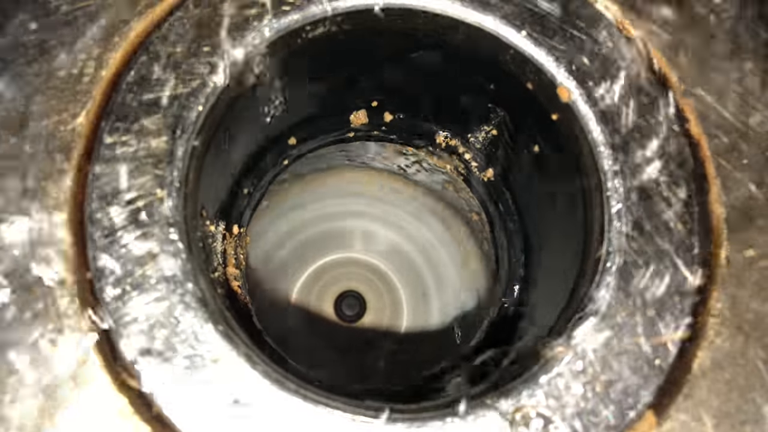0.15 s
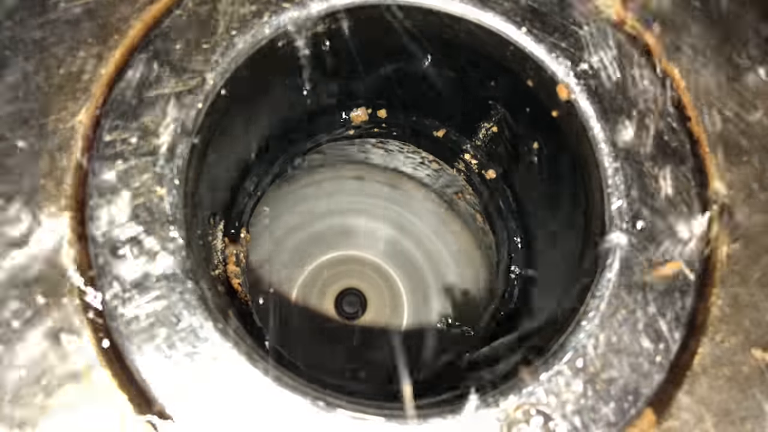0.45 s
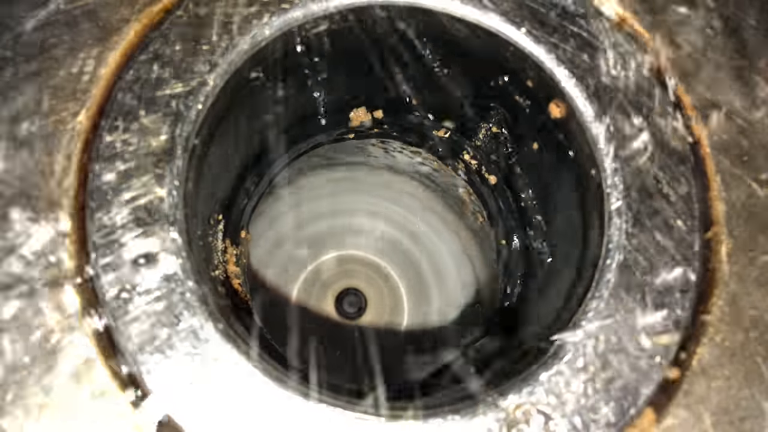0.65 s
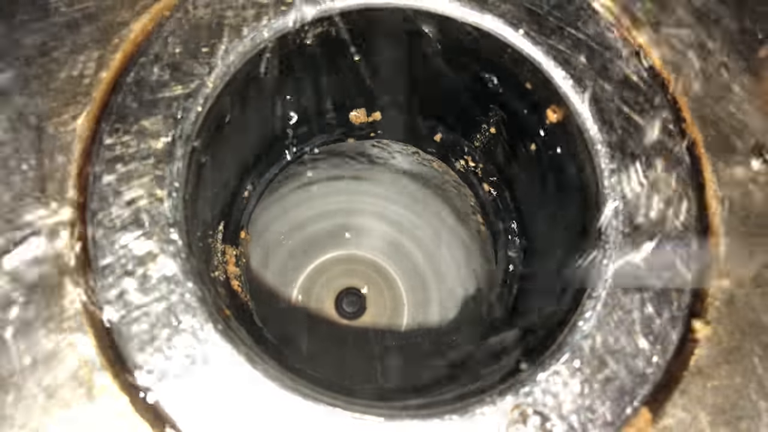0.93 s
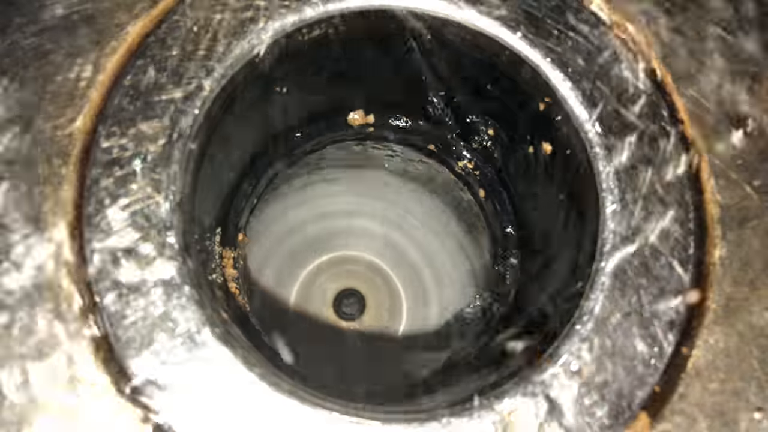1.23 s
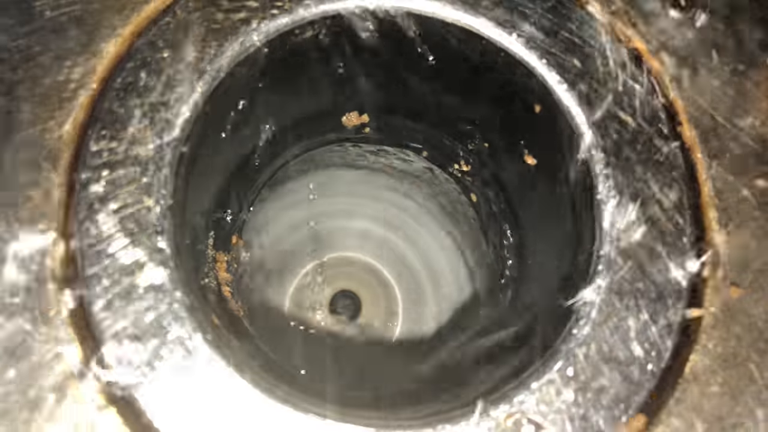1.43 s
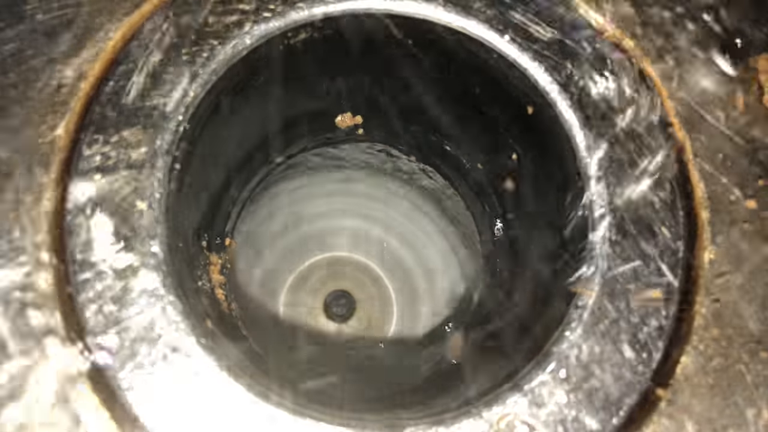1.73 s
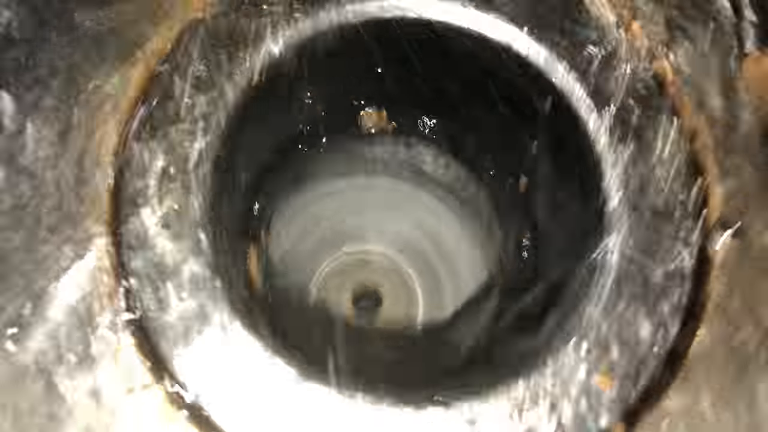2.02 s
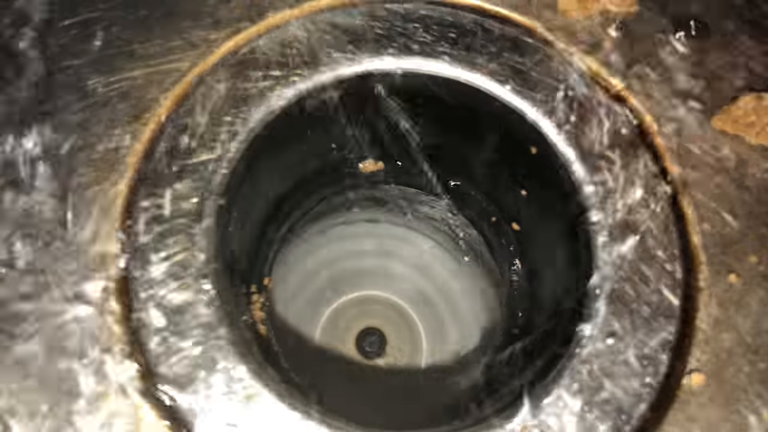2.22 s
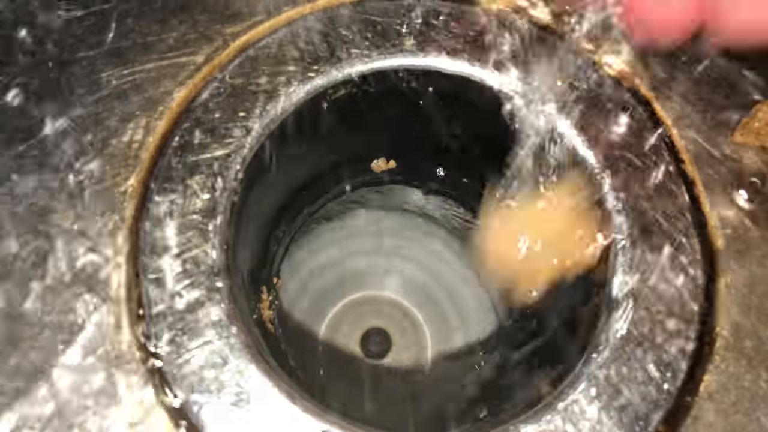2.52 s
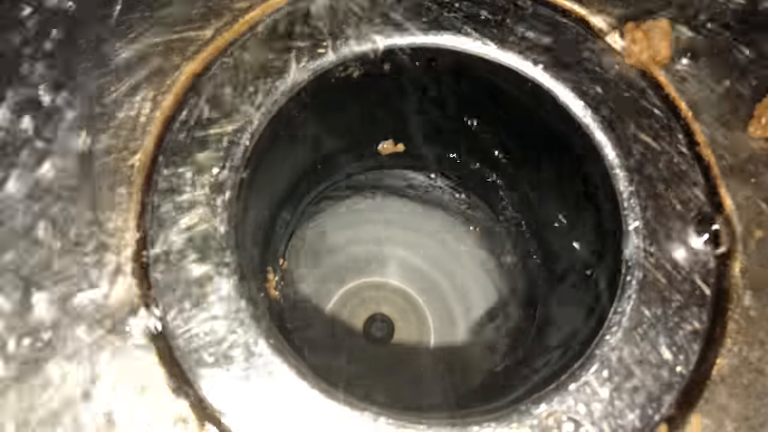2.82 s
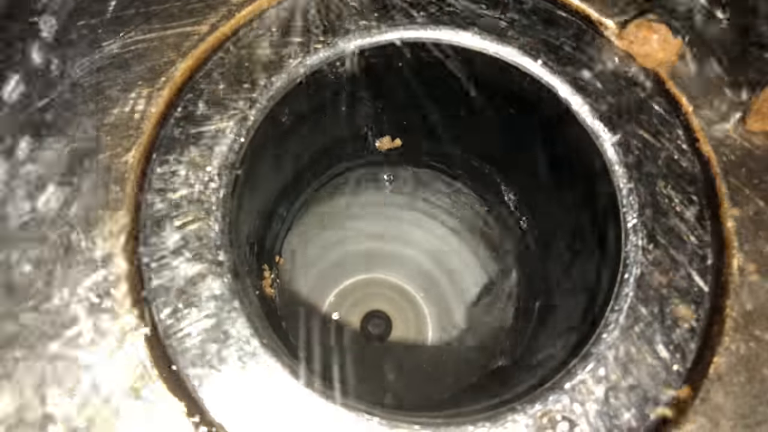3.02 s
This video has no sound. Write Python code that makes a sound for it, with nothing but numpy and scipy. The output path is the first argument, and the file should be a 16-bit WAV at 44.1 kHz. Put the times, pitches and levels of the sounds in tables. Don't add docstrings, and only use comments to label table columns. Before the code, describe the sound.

Close over a kitchen drain, a waste grinder whirs and hums without pause, churning water and clattering small scraps against metal. Soft knocks come midway, then a lump drops in and grinds harder.

```python
import sys
import numpy as np
from scipy import signal
from scipy.fft import rfft, irfft, next_fast_len
from scipy.io import wavfile
from scipy.ndimage import uniform_filter1d, minimum_filter1d, map_coordinates

SR = 44100
rng = np.random.default_rng(int(sys.argv[2]) if len(sys.argv) > 2 else 0)


def to_wav(sig):
    pcm = np.clip(np.atleast_2d(sig), -1, 1) * 32767
    pcm = np.round(pcm).astype(np.int16)
    wavfile.write(sys.argv[1], SR, pcm.T)


def invert_db(x):
    u = np.asarray(x, float) / 20
    return 10 ** u


N = 139356
TIME_S = np.arange(N) / SR
LUGS = 2


def unit(x):
    return x / np.sqrt(np.mean(x ** 2) + 1e-20)


def along(points, hz):
    f, v = np.transpose(points)
    return np.interp(np.log(hz + 1), np.log(f + 1), v)


def curves(rows):
    s, *cols = np.transpose(rows)
    return [np.interp(TIME_S, s, c) for c in cols]


def wobble(rate_hz):
    return map_coordinates(rng.standard_normal(2000), [np.arange(N) * min(rate_hz, 600) / SR])


def filtered(x, response):
    m = next_fast_len(N + SR // 2)
    return irfft(rfft(x, m) * response(np.fft.rfftfreq(m, 1 / SR)), m)[:N]


def pole(f, hz, width_hz):
    return 1j * f * width_hz / (hz * hz - f * f + 1j * f * width_hz)


def resonant(x, peaks, shape, dead=()):
    def response(f):
        h = 0
        for k, (hz, width_hz, db) in enumerate(peaks):
            h = h + (-1) ** k * invert_db(db) * pole(f + 1, hz, width_hz)
        h = h * invert_db(along(shape, f))
        for hz, width_hz, db in dead:
            h = h * (1 - (1 - invert_db(db)) * pole(f + 1, hz, width_hz))
        return h
    return unit(filtered(x, response))


def turns():
    # start_s, speed_hz
    speed = [(0.0, 81.0), (0.62, 80.2), (0.87, 80.3), (1.26, 79.7), (1.65, 79.9), (1.97, 79.3),
             (2.16, 78.4), (2.54, 79.6), (2.78, 79.4), (2.96, 78.8), (3.02, 77.1), (3.16, 78.2)]
    return 2 * np.pi * np.cumsum(curves(speed)[0]) / SR


def debris(per_s, spread_db, lug_share, surge_db):
    chance = per_s / SR * (1 + lug_share * np.sin(LUGS * turns())) * invert_db(surge_db)
    u = rng.random((3, N))
    hit, sign = u[0] < chance, np.sign(u[1] - .5)
    size = invert_db(-spread_db * np.log(u[2] + 0.0033))
    return unit(hit * sign * size)


def spatter(surge_db, mid_hz, octaves, cycles, spread_db, count):
    u, t = rng.random((count, 3)), np.arange(200) / SR
    share = np.cumsum(invert_db(surge_db) * (1 + .5 * np.sin(LUGS * turns())))
    at = np.searchsorted(share / share[-1], u[:, 0])
    hz = np.clip(mid_hz * 2 ** (octaves * rng.standard_normal(count)), 1500, 16000)[:, None]
    size = invert_db(-spread_db * np.log(u[:, 1:2] + .01))
    tone = size * np.sin(2 * np.pi * hz * t) * np.exp(-hz * t / cycles)
    where = at[:, None] + np.arange(len(t))
    return unit(np.bincount(where.ravel(), tone.ravel(), N + len(t))[:N])


def burst(rows, t60_s, cluster_s, count):
    out, t = np.zeros(N + SR), np.arange(SR // 10) / SR
    envelope = invert_db(-60 * t / t60_s) * (1 - np.exp(-t / .0006))
    for start_s, level_db in rows:
        for k in range(count):
            late, uneven = rng.standard_normal(2)
            size = invert_db(level_db - 2.5 * k + 1.5 * uneven * (k > 0))
            at = round((start_s + k * cluster_s * (1 + .2 * late)) * SR)
            out[at:][:len(t)] += size * envelope * rng.standard_normal(len(t))
    return out[:N]


def motor():
    # order, level_db, unsteadiness_db
    harmonics = [(1, -31.5, .6), (3, -35, 1.5), (4, -26.5, 1.5), (5, -39, 2), (6, -36.5, 1.4),
                 (11, -49, 2.5)]
    # start_s, level_db
    whine_level = [(0, -22), (.6, -23.5), (1, -23), (1.5, -21), (2, -23), (2.5, -21.5), (2.9, -24),
                   (3.16, -24)]
    slots, hum_hz, hum_db = 30, 120, -25
    whine_db = curves(whine_level)[0] + 1.76 * wobble(20)
    total = invert_db(whine_db) * np.sin(slots * turns() + 0.1 * wobble(32))
    for order, db, unsteady_db in harmonics:
        phase = round(order) * turns() + 0.094 * unsteady_db * wobble(19) + order * order
        total = total + invert_db(db + unsteady_db * wobble(12)) * np.sin(phase)
    hum = invert_db(hum_db + .4 * wobble(8)) * np.sin(2 * np.pi * hum_hz * TIME_S)
    return np.sqrt(2) * (total + hum)


def lumps():
    # start_s, peak_db, pitch_hz
    pushes = [(.445, -24, 44), (1.168, -19, 65), (1.558, -10, 129), (1.585, -14, 50), (2.045, -14, 222),
              (2.055, -16, 50), (2.861, -3.5, 172), (2.965, -13.5, 604), (2.978, -10, 472),
              (3.013, -9, 150), (3.03, -10, 320)]
    # start_s, peak_db
    knocks = [(1.165, -17), (1.56, -21), (2.042, -7), (2.855, -9), (2.864, -12), (2.96, -12), (2.975, -10),
              (2.99, -12), (3.003, -11), (3.017, -11)]
    contact_s = .0011
    out, t = np.zeros(N + SR), np.arange(SR // 4) / SR
    envelope = invert_db(-60 * t / 0.085) * (1 - np.exp(-t / .004))
    for start_s, db, hz in pushes:
        out[round(start_s * SR):][:len(t)] += invert_db(db) * envelope * np.sin(2 * np.pi * hz * t)
    pulse = np.sin(np.pi * np.minimum(t / contact_s, 1)) ** 2
    for start_s, db in knocks:
        out[round(start_s * SR):][:len(t)] += invert_db(db) * pulse
    return out[:N]


def rattles():
    # start_s, peak_db, brightness_db
    strikes = [(0.0453, -12.5, -19), (0.2204, -17.5, -23), (0.2756, -16.5, -17), (0.313, -10.5, -13),
               (0.4445, -18, -31), (0.606, -11.5, -11), (0.8084, -9.5, -26), (0.953, -15, -13),
               (1.0905, -11, -19), (1.4243, -16, -13), (1.4671, -10.5, -32), (1.511, -16.5, -21),
               (1.6435, -19, -6), (1.7045, -22, -17), (1.8312, -13, -12.5), (2.051, -23, -18),
               (2.158, -13.5, -23), (2.1844, -15, -20), (2.2613, -15.5, -16), (2.389, -12, -20),
               (2.4496, -12.5, -17), (2.6523, -11, -17), (2.7215, -14.5, -14), (2.7781, -10, -19),
               (2.822, -17, -18), (2.8494, -14, -14), (2.9113, -15, -11), (2.9647, -7, -21),
               (2.9906, -10.5, -26), (3.0586, -19, -22)]
    ring = [(3230, 1120, 13), (4540, 930, 1.5)]  # pitch_hz, width_hz, level_db
    dull = burst([(s, db) for s, db, _ in strikes], 0.012, .005, count=3)
    dull = filtered(dull, lambda f: sum(invert_db(db) * pole(f + 1, hz, w) ** 2 for hz, w, db in ring))
    tick = burst([(s, db + bright_db) for s, db, bright_db in strikes], 0.025, 0.0031, count=4)
    tick = filtered(tick, lambda f: pole(f + 1, 6900, 6100) ** 2)
    return invert_db(6) * (dull + tick)


def bowl(loaded):
    # pitch_hz, width_hz, level_db
    modes = [(169, 26.6, -9), (240, 78, -14), (311.5, 17.4, 0.5), (384, 47.4, -12), (449, 46, -11.5),
             (613.4, 13, -15), (624, 21, -20)]
    # pitch_hz, level_db
    rumble_shape = [(20, -3), (60, 9), (130, -4), (680, -8.5), (800, -10.5), (2000, 5)]
    bowl_db, load_db = -24, 4
    gain = invert_db(bowl_db + load_db * loaded + 0.41 * wobble(8.42))
    return gain * resonant(rng.standard_normal(N), modes, rumble_shape)


def spray(surge_db):
    # pitch_hz, level_db_per_hz
    spectrum = [(2000, -13), (2900, -2.5), (4400, -18), (4900, 0), (5800, -10), (8500, -9.5),
                (11000, -15.5), (17000, -35)]
    fizz = rng.standard_normal(N) * invert_db(0.3 * surge_db + 2.4 * np.sin(LUGS * turns()))
    drops = 1.7 * spatter(2.5 * surge_db, 8200, 0.81, 2.5, 5.0, count=5000)
    grit = 1.4 * debris(700, 2.5, .8, 3.5 * surge_db)
    return invert_db(-34) * unit(filtered(fizz + drops + grit, lambda f: invert_db(along(spectrum, f))))


def throat(surge_db, loaded):
    # pitch_hz, width_hz, level_db
    modes = [(956, 124, -7), (1030, 28, -2), (1112.5, 40.4, 5.5), (1243, 113, 7.5), (1542, 155.5, 10),
             (1803, 351, 5.5), (2219, 322, 6), (2654, 50, -13), (3098, 315, -7), (4920, 170, -17.5)]
    # pitch_hz, level_db
    throat_shape = [(40, -30), (600, -30), (880, -0.5), (1080, 2), (2600, 6), (3600, 0.5), (6000, -10),
                    (12000, -38)]
    # pitch_hz, width_hz, level_db
    cancelled = [(754, 100, -11), (1460, 250, -16), (2151, 268, -10), (2510, 60, 0)]
    # start_s, peak_db
    crunches = [(2.782, -8), (2.822, -8), (2.846, -6), (2.906, -7), (2.925, -9), (2.963, -5), (2.99, -7),
                (3.01, -8), (3.095, -9)]
    grind_db, load_db = -14, 1.2
    scraps = 1.25 * debris(1500, 4.1, 0.34, surge_db)
    churn = invert_db(0.22 * surge_db) * (rng.standard_normal(N) + scraps)
    lump = invert_db(17) * burst(crunches, .03, .004, count=4)
    return invert_db(grind_db + load_db * loaded) * resonant(churn + lump, modes, throat_shape, cancelled)


def chamber():
    # start_s, level_db
    feed = [(0.0, -34), (0.43, -34), (0.85, -35), (1.13, -34), (1.76, -35), (1.99, -34), (2.38, -36),
            (2.86, -34), (3.16, -34)]
    lump_s, rise_s = 2.77, 0.019
    loaded = np.clip((TIME_S - lump_s) / rise_s, 0, 1)
    feed_db, = curves(feed)
    surge_db = .6 * (feed_db - feed_db.mean()) + .4 * wobble(10) + 1.8 * wobble(24) + 1.3 * wobble(55)
    return bowl(loaded) + spray(surge_db) + throat(surge_db, loaded)


def scene():
    return (motor() + lumps() + rattles() + chamber())[None]


def band_limit(x):
    return signal.sosfilt(signal.butter(12, 17100, fs=SR, output="sos"), x)


def record(dry):
    mic_low_hz = 55
    x = filtered(dry[0], lambda f: (1j * f / (mic_low_hz + 1j * f)) ** 2)[None]
    need = minimum_filter1d(1 / np.maximum(np.abs(x), 1), size=89)
    return band_limit(x * uniform_filter1d(need, size=45))


dry = scene()
out = record(dry)
to_wav(out)
```